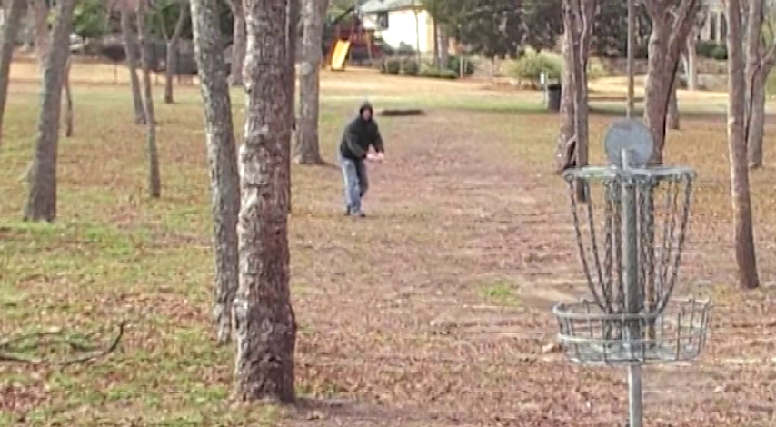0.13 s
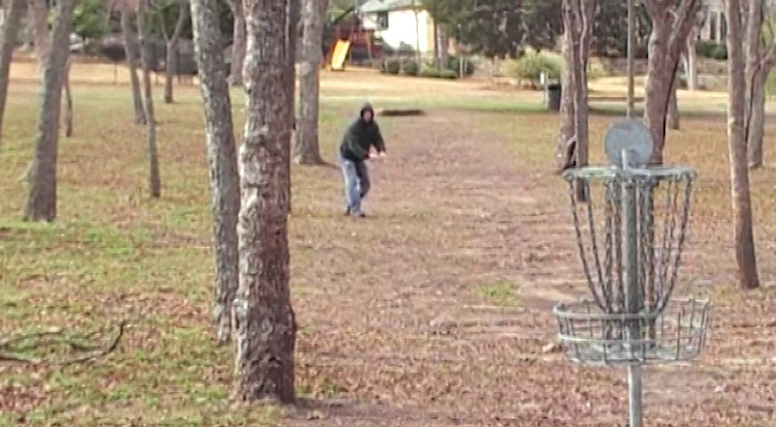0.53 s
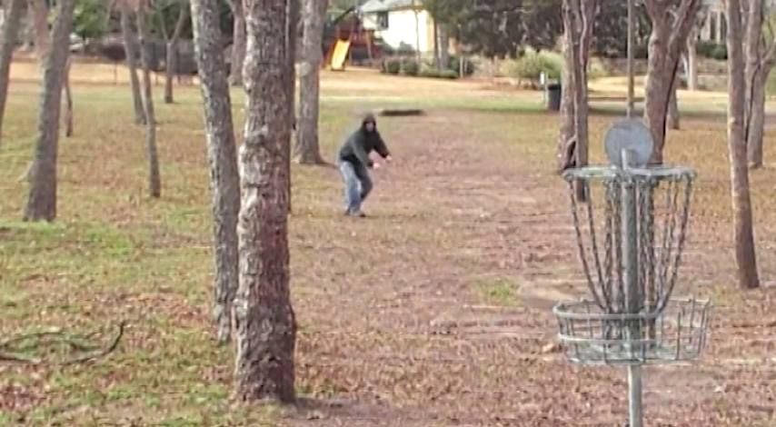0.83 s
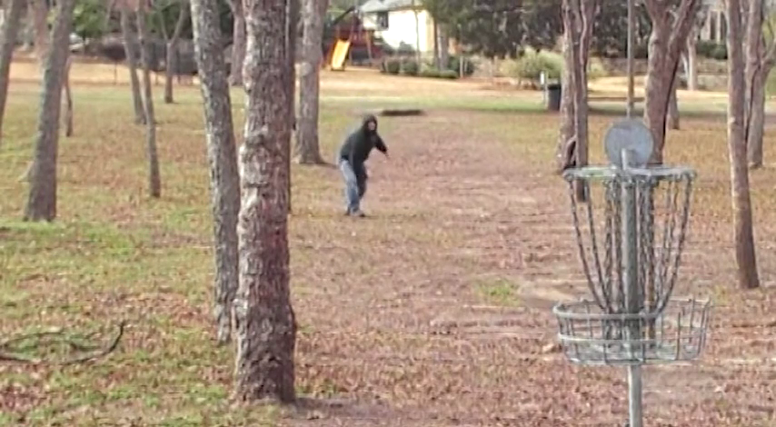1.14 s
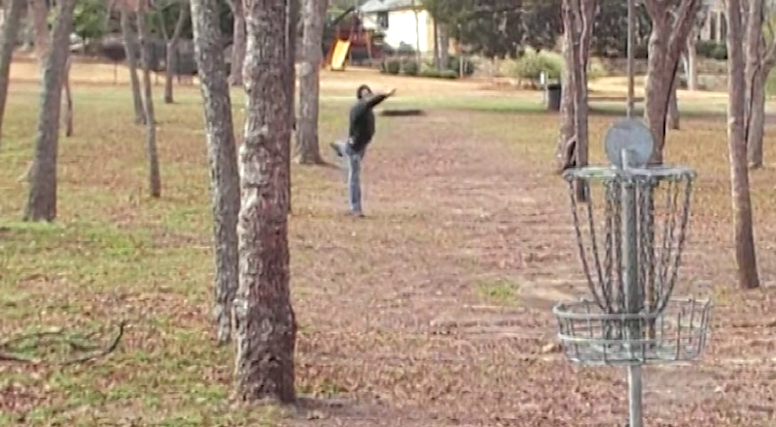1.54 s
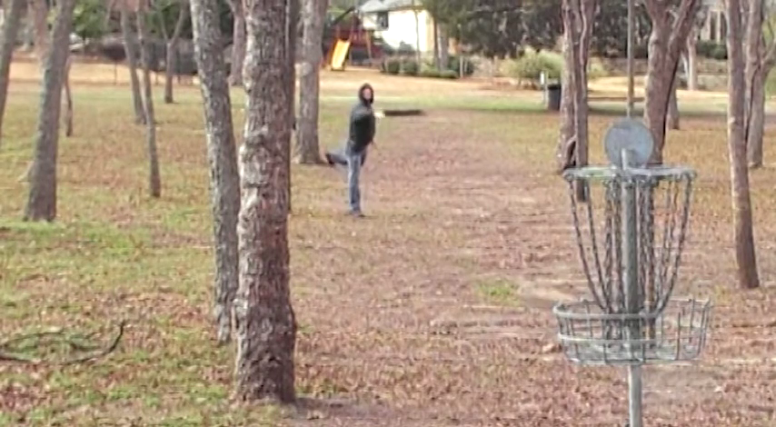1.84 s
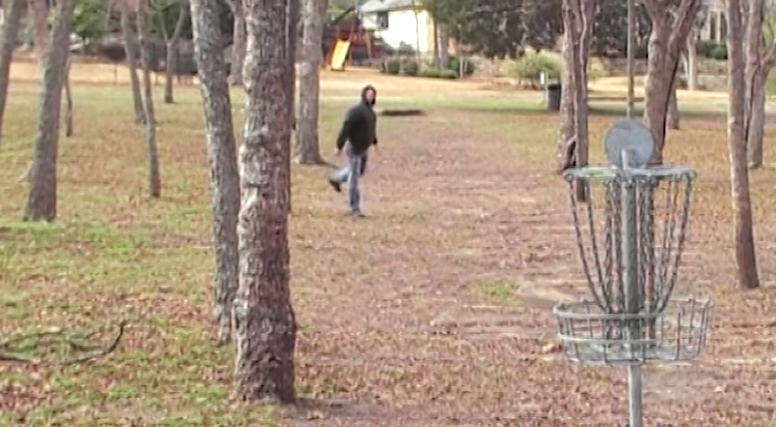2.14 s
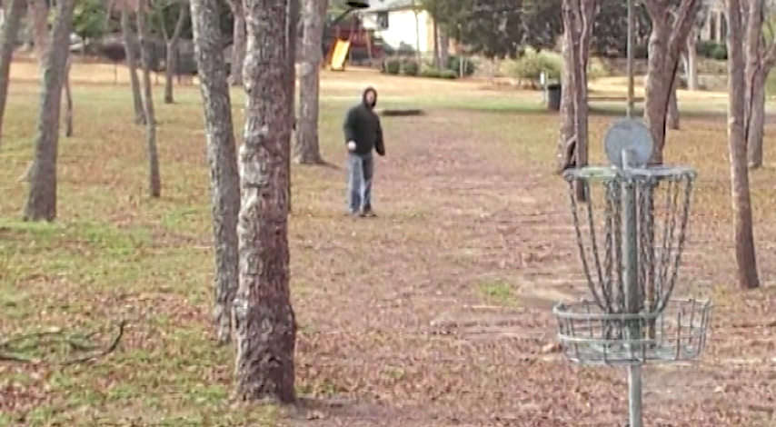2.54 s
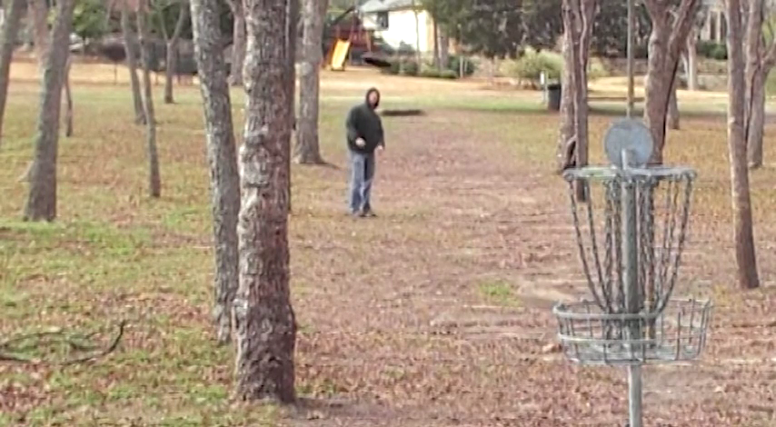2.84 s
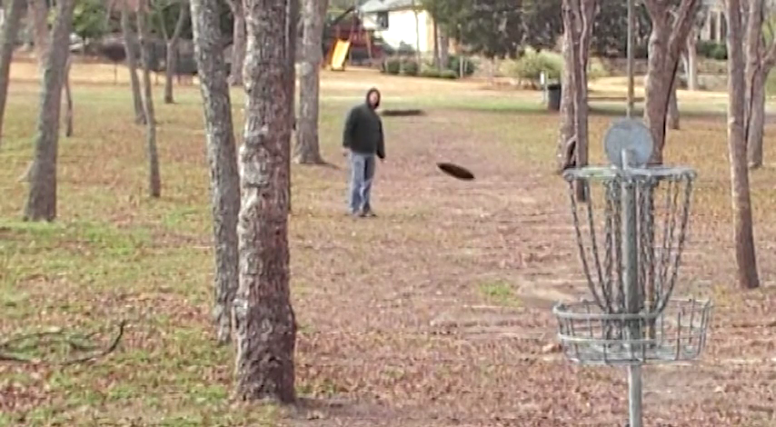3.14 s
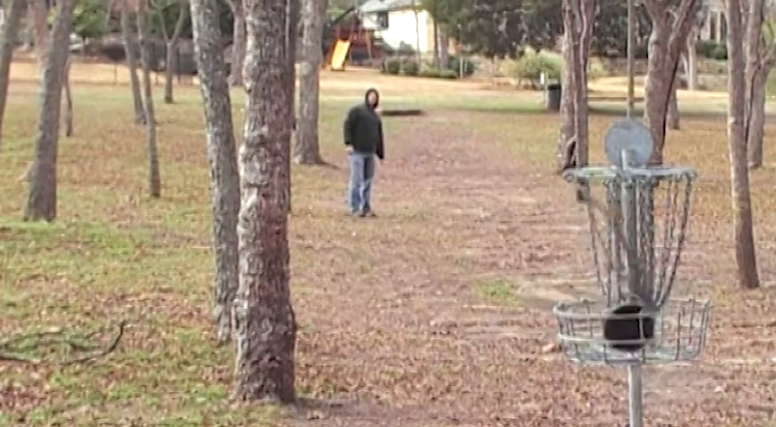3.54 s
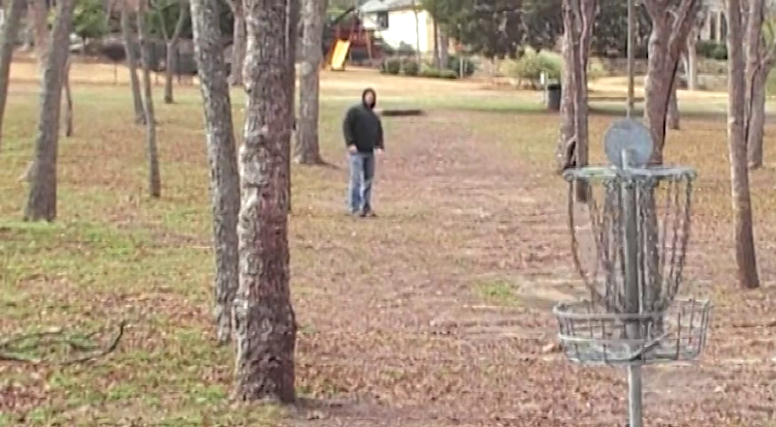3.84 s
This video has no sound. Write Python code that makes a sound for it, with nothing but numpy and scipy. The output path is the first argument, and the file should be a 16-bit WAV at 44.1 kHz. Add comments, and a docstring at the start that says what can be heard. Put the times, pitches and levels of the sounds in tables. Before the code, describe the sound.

A thrown plastic disc smashes into the chains of a steel basket close to the microphone, with bright jangling and hollow knocks, after three and a half seconds of very quiet park air, leaves and faint birds.

```python
"""A thrown plastic disc crashes into the hanging chains of a steel basket: struck links ring as decaying modes,
each contact adds a noise tick and wash, and the disc gives damped knocks with dull thuds of the tray.
Before that come faint wind and buffeting (coloured noise), dry leaves and one dull footfall (spiky band noise),
small birds (gliding sines), far dogs (sagging tones with noise), a far engine (drifting sine) and a thin
electronic whine (two sines)."""
import sys
import numpy as np
from scipy import signal
from scipy.fft import rfft, irfft, next_fast_len
from scipy.io import wavfile
from scipy.ndimage import uniform_filter1d, map_coordinates

SR = 44100
rng = np.random.default_rng(int(sys.argv[2]) if len(sys.argv) > 2 else 0)


def bounce(signal):
    """Save signal as a 16-bit WAV file at the path given by the first command-line argument."""
    frames = np.transpose(np.atleast_2d(signal))
    limited = np.clip(frames, -1, 1)
    pcm = np.round(limited * 32767).astype(np.int16)
    wavfile.write(sys.argv[1], SR, pcm)


N = 176400  # samples, 4 s

# In spectra the levels are relative densities: the noise is scaled to rms 1 afterwards.
# Wind in trees over a far rumble: pitch_hz, level_db
AIR_SPECTRUM = [(15, -56), (25, -36), (55, -25), (75, -8), (122, -1.5), (144, -8.5), (169, -2.5), (240, -3),
                (848, 0), (1020, -3), (2120, -12.5), (2560, -16), (6210, -26.5), (7100, -25), (7700, -24),
                (8350, -26), (15500, -41.5)]
# Course of the wind, before AIR_DB: start_s, level_db
AIR_LEVEL = [(0.0, -45), (2.63, -46), (2.95, -45.5), (3.01, -46), (3.45, -46)]
# Left-right correlation of the wind: pitch_hz, correlation (-1 to 1)
AIR_CORRELATION = [(60, 0.81), (150, 0.97), (380, 0.97), (950, 0.94), (2380, 0.8), (5980, 0.38),
                   (15000, -0.5)]
# Left-minus-right balance of the wind: pitch_hz, level_db
AIR_PAN = [(60, 3.5), (240, 2.0), (950, 1.5), (3770, 0.5), (15000, 2.5)]
AIR_DB, AIR_WAVER_DB = -0.5, 0.04  # level offset, depth of the slow waver
# Wind turbulence at either side: pitch_hz, level_db
BUFFET_SPECTRUM = [(15, -20), (30, 2), (70, 11), (120, -1), (250, 1), (600, -40), (3000, -100)]
# Course of the buffeting: start_s, level_db
BUFFET_LEVEL = [(0, -96), (.9, -62), (1.25, -63.5), (1.6, -74), (4, -68)]

# Course of the engine hum: start_s, level_db
HUM_LEVEL = [(0, -56.5), (1.3, -60), (1.6, -69), (4, -98)]
HUM_HZ, HUM_DRIFT, HUM_WAVER_DB = 173.7, 0.0206, 0.91  # mean pitch, relative pitch drift, level waver
PULSED_HZ, PULSED_DB, STEADY_HZ, STEADY_DB = 7865, -64, 9130, -75  # the two tones of the whine
PULSE_RATE_HZ, PULSE_ON_S = 15, 1.995  # pulse rate, onset of one pulse in the endless train

# Stirring leaves and twigs, and one dull footfall at 1.117 s: start_s, length_s, centre_hz, level_db
RUSTLES = [(0, .45, 2120, -58), (0.078, 0.23, 8300, -69), (0.586, 0.042, 9000, -67),
           (0.664, 0.054, 8950, -67), (1.117, .05, 610, -47), (1.345, 0.12, 2030, -54),
           (3.06, .22, 3300, -65), (1.46, .09, 11500, -69.5), (2.17, 0.15, 4840, -64),
           (2.65, .06, 9000, -68)]
RUSTLE_HALF_WIDTH_OCT = 0.23  # octaves from the centre to half gain

# Whistles of small birds: start_s, length_s, first_hz, last_hz, level_db
CHIRPS = [(1.26, .04, 8400, 7400, -51), (1.32, .03, 7500, 7400, -64), (1.386, .014, 4500, 4250, -56),
          (1.92, .03, 7050, 6800, -61), (2.32, .022, 3050, 2900, -59), (2.365, .02, 3000, 2900, -62),
          (2.95, .035, 7400, 7200, -66), (3.32, .025, 6800, 7700, -65)]
BIRD_WAVER, BIRD_FLUTTER_DB = .006, 6  # relative pitch waver, level flutter

# Barks of far dogs: start_s, length_s, level_db
BARKS = [(2.73, 0.048, -47.5), (2.832, 0.039, -42), (2.906, .09, -46), (3.04, 0.051, -49)]
# Hoarse part of a bark: pitch_hz, level_db
MUZZLE_SPECTRUM = [(150, -50), (300, -19), (470, 8), (600, -1), (760, 7), (900, -6), (1100, -14),
                   (2000, -42.5), (6000, -90)]
BARK_HZ, BARK_SAG, BARK_ROUGH_DB = 489.3, 0.066, 0.5  # first pitch, relative fall, hoarse part's level

# Clashes of the chains, the last four columns exciting the four families of link modes, from low to top:
# start_s, clatter_db, low_db, middle_db, high_db, top_db
CLASHES = [(3.4981, -19, -23.5, -26, -35, -35), (3.502, -19.5, -35, -16.5, -22, -10.5),
           (3.507, -21.5, -37, -19, -22, -14), (3.520, -48, -28, -34, -19.5, -12),
           (3.528, -27.5, -47, -24, -31, -12.5), (3.535, -31, -36, -12, -35, -12),
           (3.553, -47, -28, -30, -30, -10.5), (3.575, -34, -27.5, -14.5, -27, -11.5),
           (3.584, -43, -23.5, -33, -23, -12), (3.598, -31, -39, -41, -41, -8.5),
           (3.630, -23, -31, -28, -24, -17), (3.650, -25.5, -27, -26, -29, -27),
           (3.688, -29.5, -25.5, -28, -41, -17.5), (3.701, -33, -30, -18, -40, -19),
           (3.725, -29, -31, -25, -42, -24), (3.746, -28, -36, -21, -34, -19),
           (3.772, -30.5, -33, -37, -45, -33), (3.797, -41, -30, -33, -33, -23),
           (3.809, -39, -44, -40, -33, -27), (3.842, -32.5, -49, -30, -30.5, -22.5),
           (3.865, -35, -41, -29.5, -35, -20.5), (3.896, -37, -48, -28.5, -33, -21),
           (3.916, -36.5, -54, -34, -40, -17), (3.934, -39, -50, -42, -26.5, -28),
           (3.958, -38.5, -57, -37, -30, -27), (3.965, -55, -52, -49, -50, -21)]
# Edges of the families of link modes: pitch_hz
FAMILY_EDGES = [2000, 4000, 8500, 10500, 15000]
# Modes of the links, levels relative within a family: pitch_hz, level_db
LINK_MODES = [(2602, -43.5), (2626, -44.5), (2683, -47.5), (2801, -47), (3070, -51), (5060, -50),
              (5146, -53), (6930, -44), (7325, -47.5), (7379, -40.5), (7432, -40.5), (7585, -49.5),
              (7783, -54), (7930, -38.5), (8000, -41.5), (8200, -42.5), (8860, -42.5), (9035, -41),
              (11350, -42), (11653, -43.5), (11745, -37), (11880, -34), (11998, -34), (12065, -32),
              (12115, -39), (12236, -44), (12650, -37), (12717, -40), (13792, -51), (13930, -49)]
# Modes of the wire basket and pole, levels relative to each other: pitch_hz, level_db
BASKET_MODES = [(452, -58), (640, -57), (840, -61), (1518, -52.5), (1583, -48.5), (1740, -54.5),
                (4339, -66), (4748, -59), (5075, -47), (5421, -58), (6412, -55)]
SCATTER_S, CONTACT_SPREAD_DB = .004, 1.5  # mean delay and level spread of the contacts in one clash
DETUNE, LINK_PAN_DB = .0015, 0.5  # relative pitch spread; level spread of a link at each side
# Most of a ring is choked by the next link; a part rings on freely.
CHOKED_T60_S, FREE_T60_S, FREE_DB = 0.076, 0.91, -16
SWAY_RAD, SWAY_RATE_HZ = 1, 30  # phase waver of the ringing steel, as it swings
BASKET_DB, BASKET_T60_S = -23, 2.7  # level relative to clatter_db, decay time

# Dense steel noise of a contact: pitch_hz, level_db
CLATTER_SPECTRUM = [(150, -50), (300, -41), (700, -10.5), (1500, -2.5), (2200, -4.5), (3000, 0), (3800, -8),
                    (5200, 1), (6600, 2), (8300, 0.5), (10300, -1), (12000, -2), (13300, -6), (14000, -4),
                    (14700, -31), (16000, -16)]
# Wash and tick, levels relative to clatter_db
WASH_DB, WASH_T60_S, TICK_DB, TICK_T60_S = 2, 0.19, -3, 0.0056

# Knocks of the disc on pole and tray: start_s, knock_db, thud_db (of the tray)
KNOCKS = [(3.503, -19, -55), (3.507, -15.5, -55), (3.525, -33, -66), (3.543, -26, -63), (3.565, -40, -58),
          (3.635, -9.5, -36), (3.828, -18, -50), (3.843, -29, -52), (3.906, -29, -65)]
# Body of the plastic disc: pitch_hz, level_db
DISC_SPECTRUM = [(150, -53), (430, -17), (650, -34), (850, -5), (1100, -8), (1450, 7.5), (1900, -24),
                 (2600, -33), (5000, -13.5)]
DISC_T60_S, TRAY_HZ, TRAY_T60_S = .021, 431, 0.11

# Left-minus-right balance of the crash: pitch_hz, level_db
CRASH_PAN = [(500, -0.5), (2700, 0.5), (8000, -0.5), (9100, 1.5), (10300, 4), (11500, -9), (12100, -5),
             (12700, -0.5), (14000, -4.5)]
# Phase by which the left side leads in the crash: pitch_hz, lead_rad
CRASH_LEAD = [(0, -0.2), (6290, 0.0), (6980, -0.37), (8440, -0.38), (9820, -0.8), (10200, -0.5),
              (10500, -0.7), (11000, -0.5), (11500, -0.4), (12700, 0.45), (13300, 0.0), (15800, 0.5)]
LOW_CUT_HZ, TOP_HZ = 39, 15800  # band limits of the whole sound


def amp(db):
    """Decibel law: 20 dB is a factor of ten in amplitude."""
    return 10 ** (np.asarray(db) / 20)


def unit(x):
    """Power normalisation: scale to rms 1."""
    return x / np.sqrt(np.mean(x ** 2) + 1e-20)


def along(points, hz):
    """Interpolation of (pitch_hz, value) points on a logarithmic frequency axis."""
    f, v = np.transpose(points)
    return np.interp(np.log(hz + 1), np.log(f + 1), v)


def clock(length_s):
    """Uniform sampling of time: the sample times in seconds."""
    return np.arange(int(length_s * SR)) / SR


def add(out, start_s, x):
    """Superposition: mix x into out from a start time."""
    i = int(round(start_s * SR))
    out[i:i + len(x)] += x[:len(out) - i]


def filtered(x, response):
    """Linear filtering: multiply the spectrum of x by a response of frequency."""
    n = x.shape[-1]
    m = next_fast_len(n + 8192)
    hz = np.fft.rfftfreq(m, 1 / SR)
    return irfft(rfft(x, m) * response(hz), m)[..., :n]


def noise(spectrum, size=16384):
    """Spectral shaping of white noise, scaled to rms 1."""
    white = rng.standard_normal(size)
    return unit(filtered(white, lambda hz: amp(along(spectrum, hz))))


def fade(t, t60_s):
    """Exponential decay: 60 dB lost in t60_s."""
    return np.exp(-np.log(1000) * t / t60_s)


def sides(pan, hz):
    """Interaural level difference: left and right gains at each frequency."""
    return amp(np.outer([.5, -.5], along(pan, hz)))


def arch(t):
    """Swell envelope: the root of a half sine over the span of t."""
    return np.sqrt(np.abs(np.sin(np.pi * t / t[-1])))


def wobble(rate_hz, size=N):
    """Band-limited random modulation: a spline through random knots, rate_hz of them a second."""
    knots = rng.standard_normal(int(size * rate_hz / SR) + 4)
    return map_coordinates(knots, [np.arange(size) * rate_hz / SR])


def level(rows):
    """Amplitude envelope: gain per sample from (start_s, level_db) points."""
    return amp(np.interp(np.arange(N) / SR, *np.transpose(rows)))


def tone(hz):
    """Phase integration: a sine whose instantaneous frequency is the array hz."""
    return np.sin(2 * np.pi * np.cumsum(hz) / SR)


def air():
    """Partial coherence: wind mixes two independent noises as mid and side to set the left-right correlation."""
    def shares(hz):
        angle = np.arccos(np.clip(along(AIR_CORRELATION, hz), -1, 1)) / 2
        return np.array([np.cos(angle), np.sin(angle)])

    sources = np.array([noise(AIR_SPECTRUM, size=N), noise(AIR_SPECTRUM, size=N)])
    mid, side = filtered(sources, shares)
    pair = np.array([mid + side, mid - side])
    pair = unit(filtered(pair, lambda hz: sides(AIR_PAN, hz)))
    return pair * level(AIR_LEVEL) * amp(AIR_DB + AIR_WAVER_DB * wobble(10))


def buffet():
    """Local turbulence: the breeze makes independent low noise at each side."""
    pair = np.array([noise(BUFFET_SPECTRUM, size=N), noise(BUFFET_SPECTRUM, size=N)])
    return level(BUFFET_LEVEL) * pair


def engine():
    """Frequency and amplitude modulation: a far engine's hum wavers and fades away."""
    hz = HUM_HZ * (1 + HUM_DRIFT * wobble(8.1))
    return level(HUM_LEVEL) * amp(HUM_WAVER_DB * wobble(10.7)) * tone(hz)


def whine():
    """Gated oscillation: an electronic whine of one pulsing tone and one steady tone."""
    t = np.arange(N) / SR
    gate = ((t - PULSE_ON_S) * PULSE_RATE_HZ % 1 < .5) * 1.
    gate = uniform_filter1d(gate, size=100)  # soften the edges
    pulsed = amp(PULSED_DB) * gate * np.sin(2 * np.pi * PULSED_HZ * t)
    return pulsed + amp(STEADY_DB) * np.sin(2 * np.pi * STEADY_HZ * t)


def leaves_and_footfall():
    """Impulsive noise: cubed noise is spiky; a high band makes it dry crackle, the lowest one a dull footfall."""
    out = np.zeros(N)
    for start_s, length_s, centre_hz, db in RUSTLES:
        def band(hz):
            octaves = np.log2((hz + 1) / centre_hz)
            return 1 / (1 + (octaves / RUSTLE_HALF_WIDTH_OCT) ** 2)

        t = clock(length_s)
        spiky = unit(filtered(rng.standard_normal(SR // 2) ** 3, band))
        add(out, start_s, amp(db) * arch(t) * spiky[:len(t)])
    return out


def birds():
    """Frequency glide: thin, trembling whistles slide fast and then settle."""
    out = np.zeros(N)
    for start_s, length_s, first_hz, last_hz, db in CHIRPS:
        t = clock(length_s)
        hz = last_hz + (first_hz - last_hz) * (1 - t / length_s) ** 2
        hz = hz * (1 + BIRD_WAVER * wobble(500, size=len(t)))
        flutter = unit(amp(BIRD_FLUTTER_DB * wobble(67, size=len(t))))
        add(out, start_s, amp(db) * arch(t) * flutter * tone(hz))
    return out


def dogs():
    """Voiced and turbulent sound: each far, dull bark adds hoarse noise to a sagging tone."""
    out = np.zeros(N)
    for start_s, length_s, db in BARKS:
        t = clock(length_s)
        voice = tone(BARK_HZ * (1 - BARK_SAG * t / length_s))
        hoarse = amp(BARK_ROUGH_DB) * noise(MUZZLE_SPECTRUM)[:len(t)]
        add(out, start_s, amp(db) * arch(t) * (voice + hoarse))
    return out


def contacts(count=4):
    """Multiple impact: each clash is a quick run of contacts sharing its energy; gives times and shares."""
    delay = rng.exponential(SCATTER_S, (len(CLASHES), count))
    delay[:, 0] = 0
    share = amp(CONTACT_SPREAD_DB * rng.standard_normal(delay.shape))
    share = share / np.linalg.norm(share, axis=1, keepdims=True)
    return np.array(CLASHES)[:, :1] + delay, share


def mode(times, sizes, hz, decay):
    """Modal response: blows of random phase convolved with one decaying oscillation, wavering in phase."""
    size = len(decay)
    places = np.clip(times * SR, 0, size - 1).astype(int)
    blows = np.zeros(size, complex)
    np.add.at(blows, places, sizes * np.exp(2j * np.pi * rng.random(times.shape)))
    response = decay * np.exp(2j * np.pi * hz * np.arange(size) / SR)
    ring = signal.fftconvolve(blows, response)[:size]
    sway = np.exp(1j * SWAY_RAD * wobble(SWAY_RATE_HZ, size=size))
    return np.sqrt(2) * (ring * sway).real


def steel(times, share, count=2):
    """Modal superposition: contacts ring slightly unlike links and shake the basket's longer modes."""
    out = np.zeros((2, N))
    start_s = times.min()
    t = np.arange(24000) / SR
    strength = amp(np.array(CLASHES)[:, 1:])
    links, basket = np.array(LINK_MODES), np.array(BASKET_MODES)
    free = amp(FREE_DB)
    decay = (1 - free) * fade(t, CHOKED_T60_S) + free * fade(t, FREE_T60_S)
    for k, (lo, hi) in enumerate(zip(FAMILY_EDGES, FAMILY_EDGES[1:])):
        family = links[(links[:, 0] > lo) & (links[:, 0] <= hi)]
        total = np.linalg.norm(amp(family[:, 1])) * np.sqrt(count)
        blows = share * strength[:, [k + 1]]
        for hz, db in family:
            for link in range(count):
                pitch_hz = hz * (1 + DETUNE * link * rng.standard_normal())  # link 0 stays in tune
                ring = amp(db) / total * mode(times - start_s, blows, pitch_hz, decay)
                for channel in out:  # each link hangs in its own place
                    add(channel, start_s, amp(LINK_PAN_DB * rng.standard_normal()) * ring)
    for hz, db in basket:
        gain = amp(db + BASKET_DB) / np.linalg.norm(amp(basket[:, 1]))
        ring = gain * mode(times - start_s, share * strength[:, :1], hz, fade(t, BASKET_T60_S))
        for channel in out:
            add(channel, start_s, ring)
    return out


def clatter(times, share):
    """High modal density: every contact excites steel noise as a sharp tick and a short wash."""
    out = np.zeros(N)
    for row, run, sizes in zip(CLASHES, times, share):
        for start_s, size in zip(run, sizes):
            dense = noise(CLATTER_SPECTRUM)
            t = np.arange(len(dense)) / SR
            envelope = amp(WASH_DB) * fade(t, WASH_T60_S) + amp(TICK_DB) * fade(t, TICK_T60_S)
            add(out, start_s, amp(row[1]) * size * dense * envelope)
    return out


def disc():
    """Heavy damping: hollow plastic knocks die quickly, while the tray answers with a decaying tone."""
    out = np.zeros(N)
    for start_s, knock_db, thud_db in KNOCKS:
        body = noise(DISC_SPECTRUM)
        t = np.arange(len(body)) / SR
        knock = amp(knock_db) * body * fade(t, DISC_T60_S)
        thud = amp(thud_db) * np.sin(2 * np.pi * TRAY_HZ * t) * fade(t, TRAY_T60_S)
        add(out, start_s, knock + thud)
    return out


def scene():
    """Stereo superposition: level and phase differences place the near crash before the wooded park."""
    def placing(hz):
        lead = np.outer([.5, -.5], along(CRASH_LEAD, hz))
        return sides(CRASH_PAN, hz) * np.exp(1j * lead)

    park = air() + buffet() + engine() + whine()
    centred = leaves_and_footfall() + birds() + dogs()
    times, share = contacts()
    crash = steel(times, share) + clatter(times, share) + disc()
    return park + centred + filtered(crash, placing)


def record(dry):
    """Clipping and band limitation: flatten peaks beyond full scale, cut the rumble and the extreme treble."""
    def band(hz):
        high_pass = 1j * hz / (1j * hz + LOW_CUT_HZ)
        return high_pass / (1 + (hz / TOP_HZ) ** 200)

    return filtered(np.clip(dry, -1, 1), band)


dry = scene()
out = record(dry)
bounce(out)
```